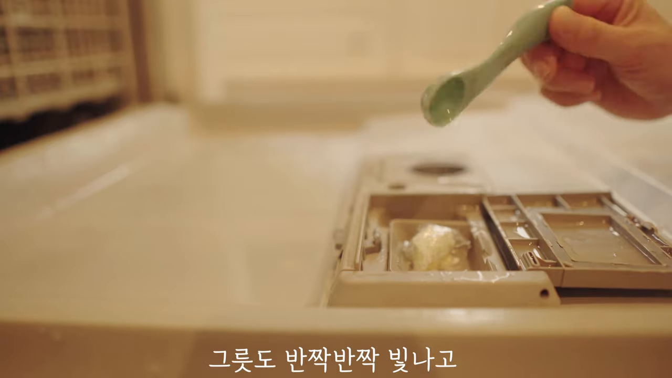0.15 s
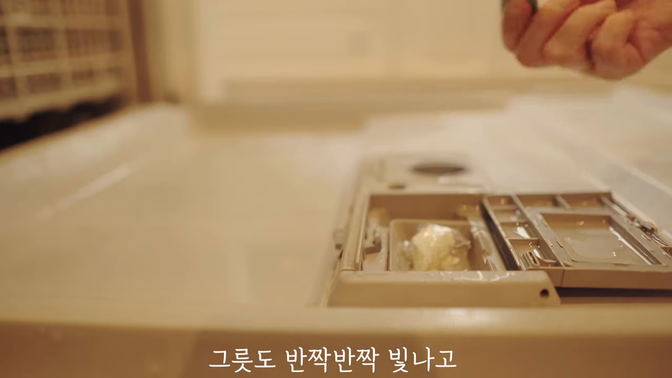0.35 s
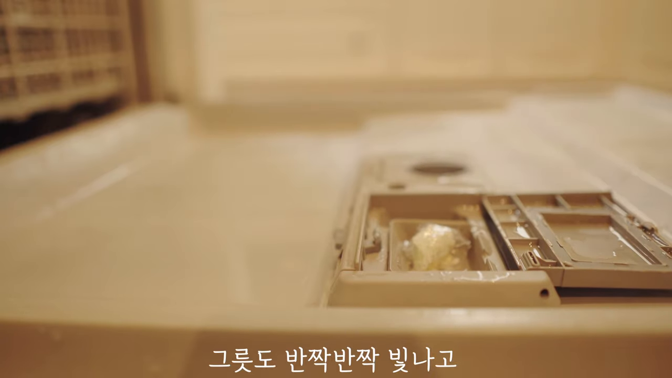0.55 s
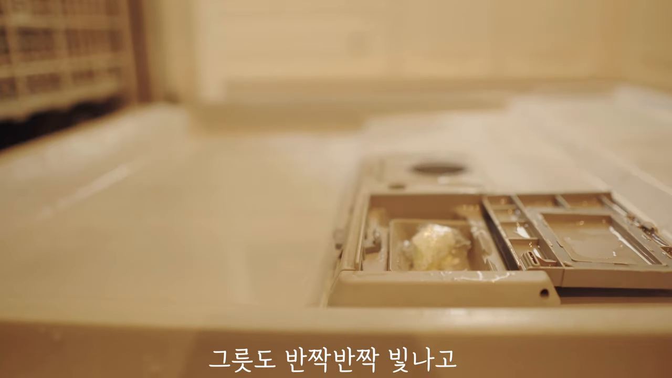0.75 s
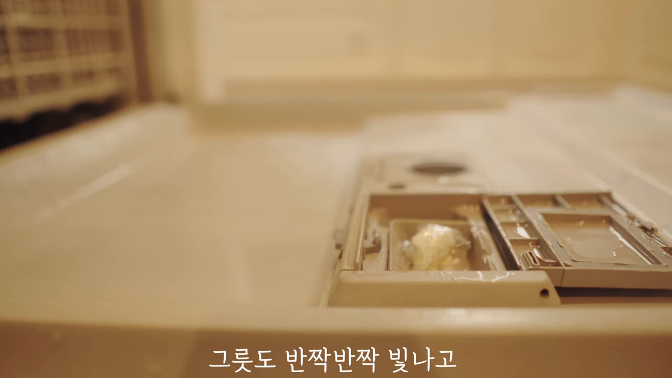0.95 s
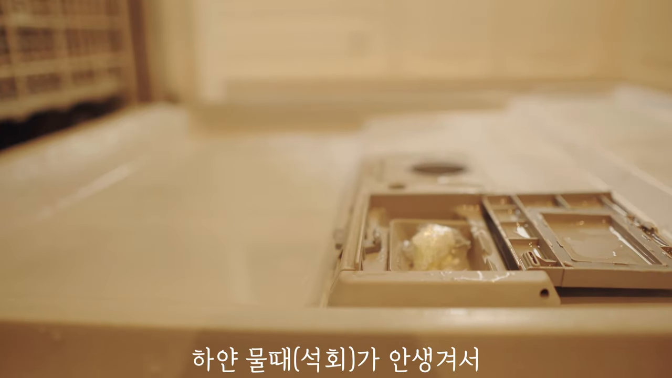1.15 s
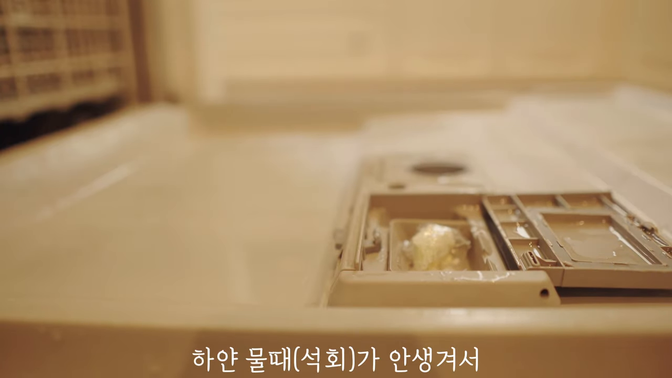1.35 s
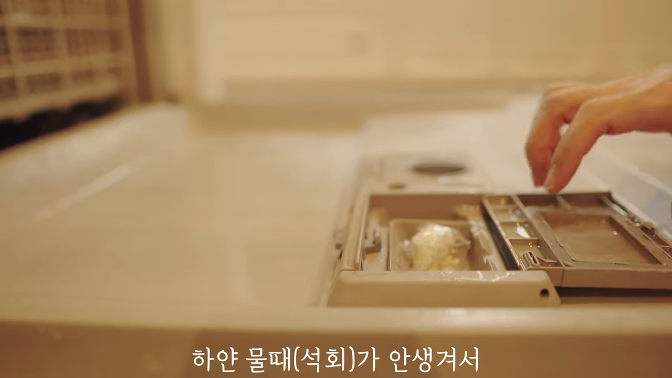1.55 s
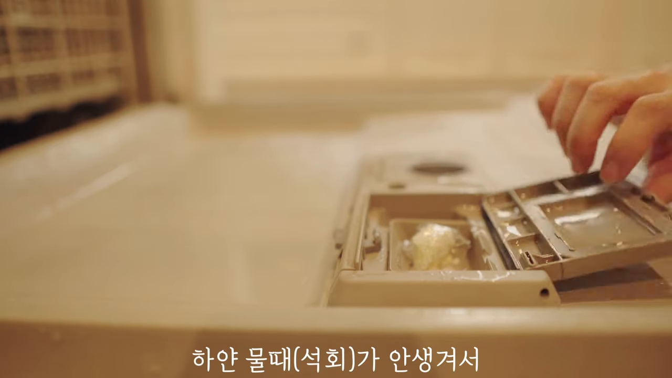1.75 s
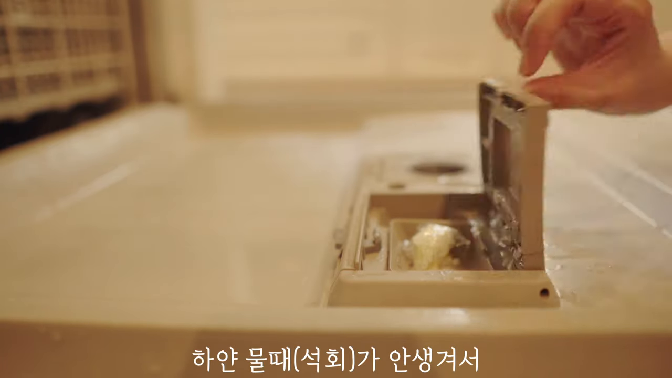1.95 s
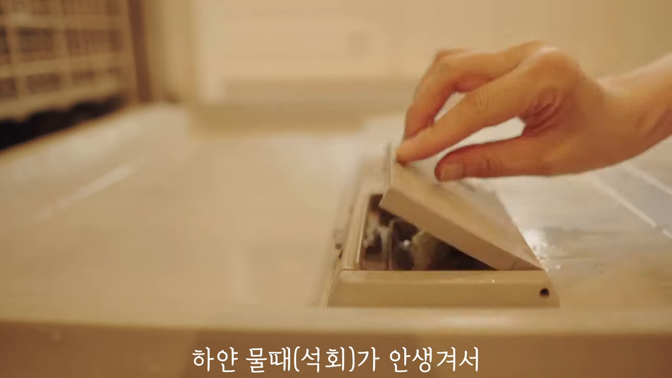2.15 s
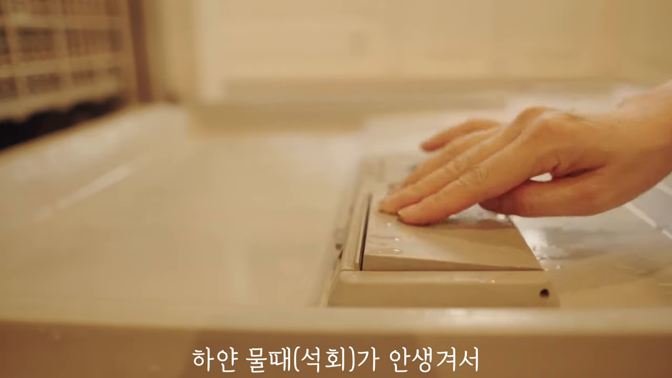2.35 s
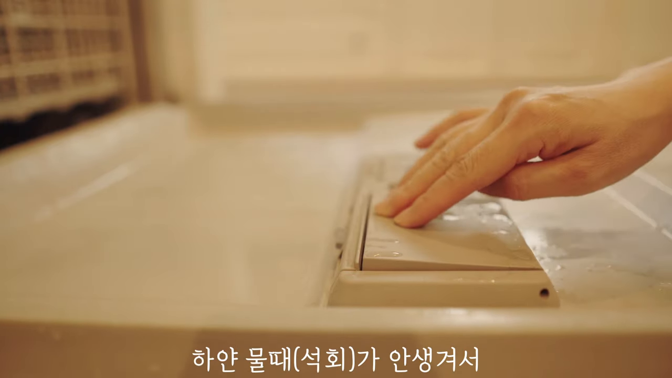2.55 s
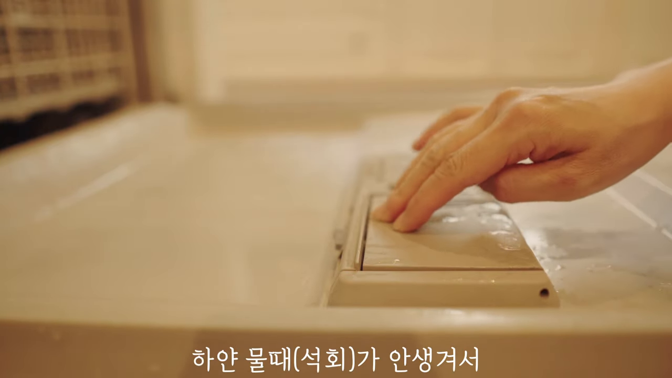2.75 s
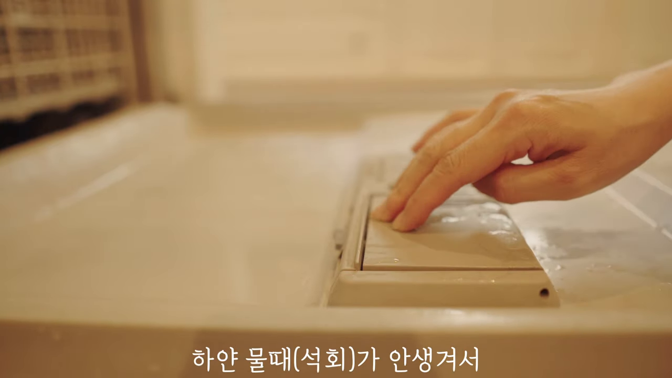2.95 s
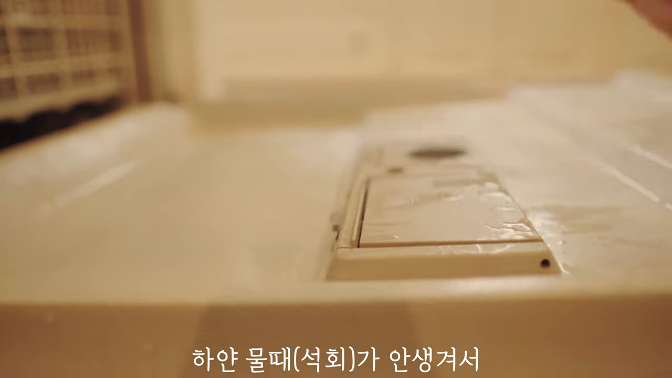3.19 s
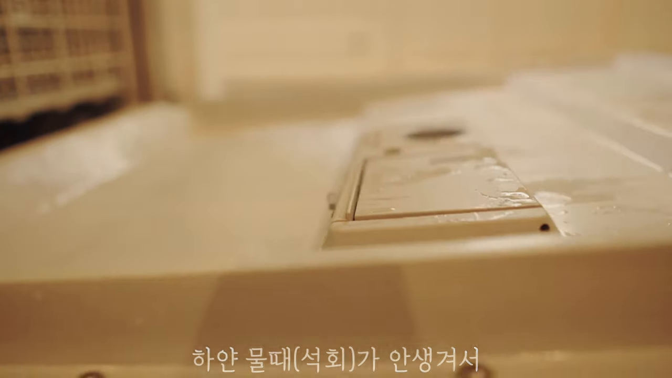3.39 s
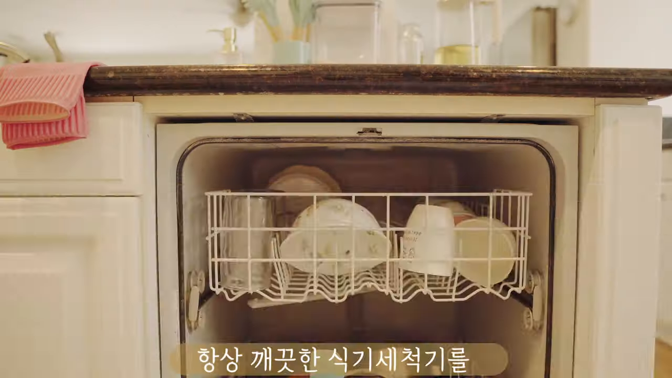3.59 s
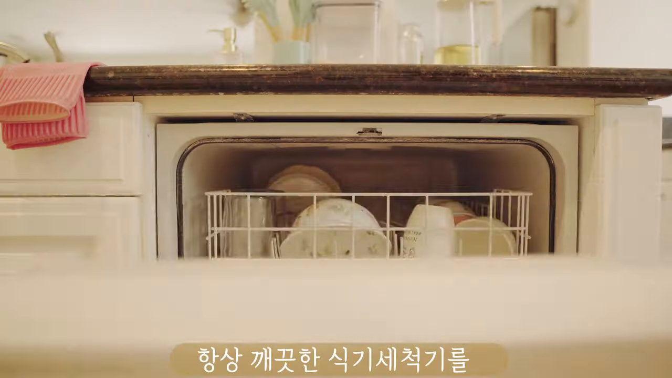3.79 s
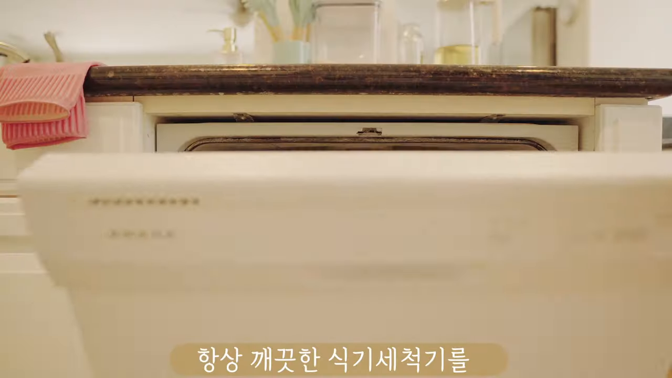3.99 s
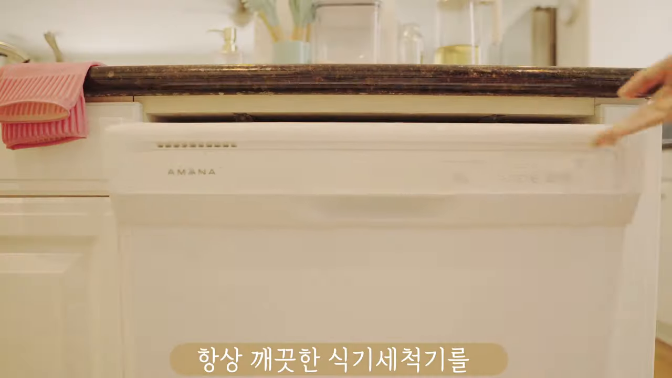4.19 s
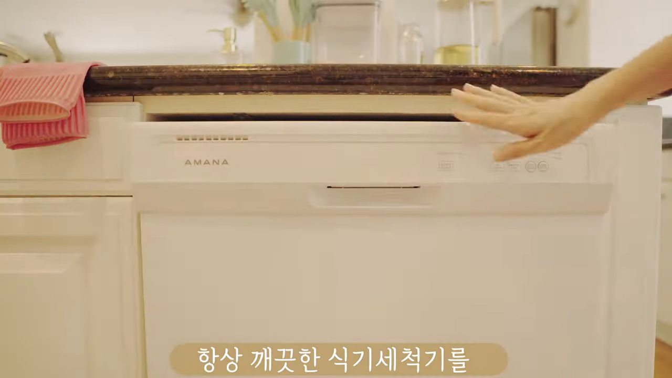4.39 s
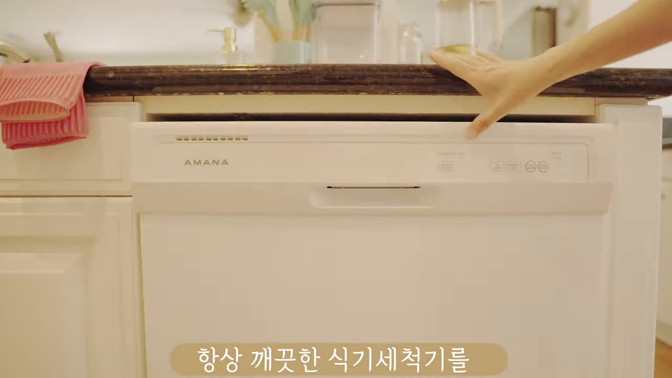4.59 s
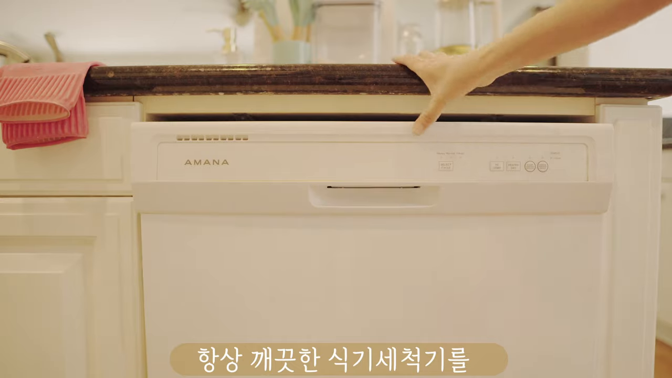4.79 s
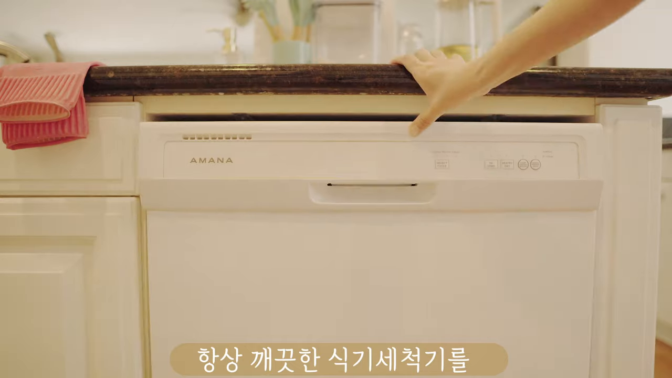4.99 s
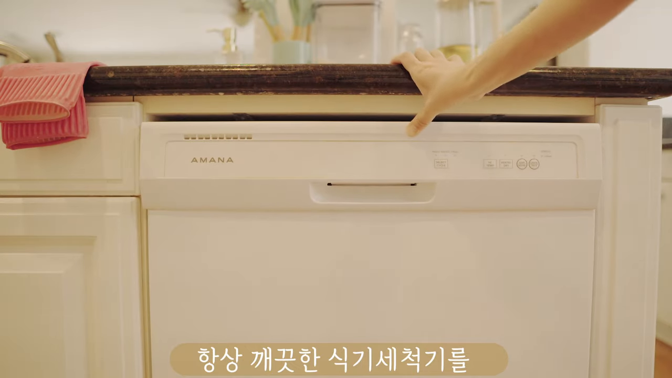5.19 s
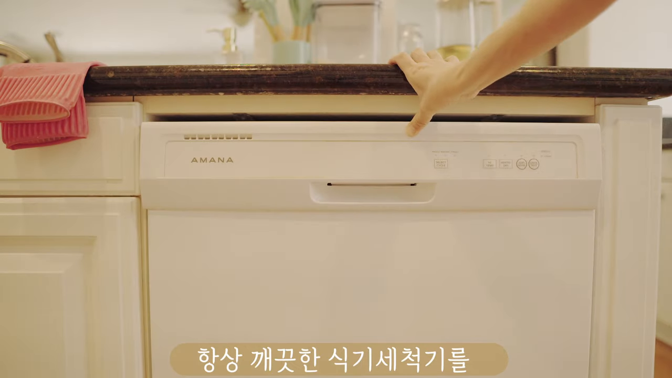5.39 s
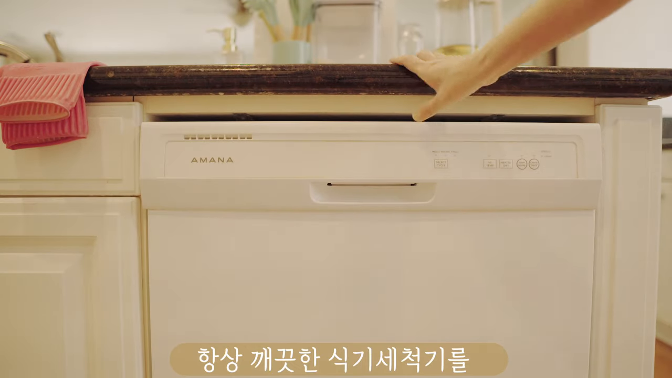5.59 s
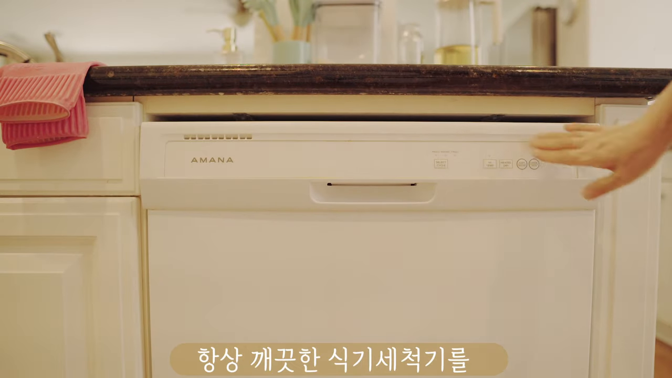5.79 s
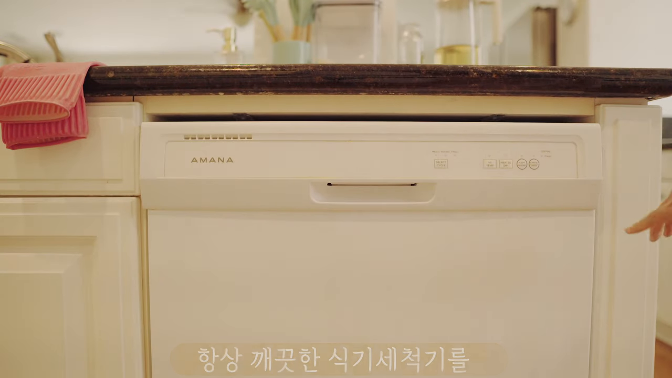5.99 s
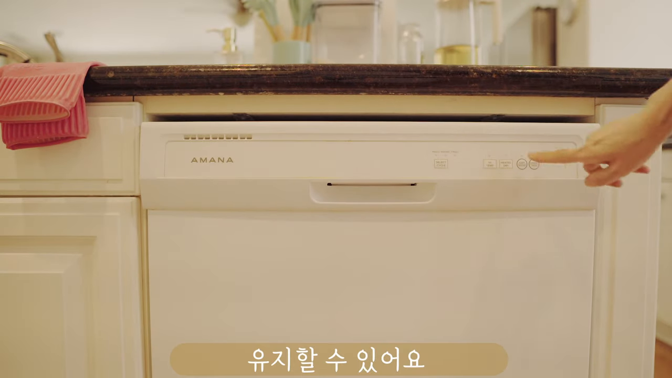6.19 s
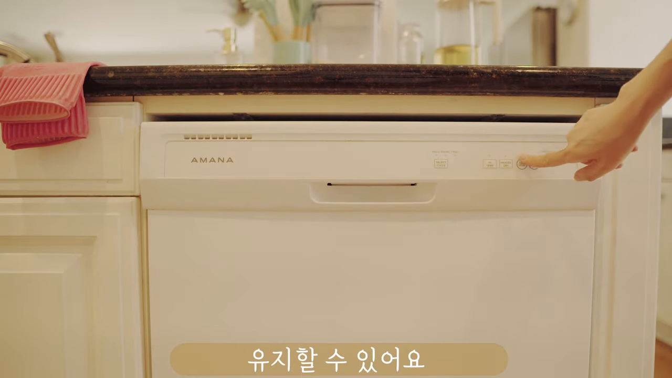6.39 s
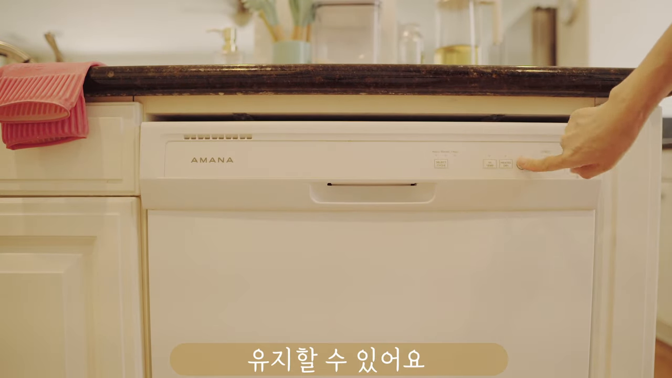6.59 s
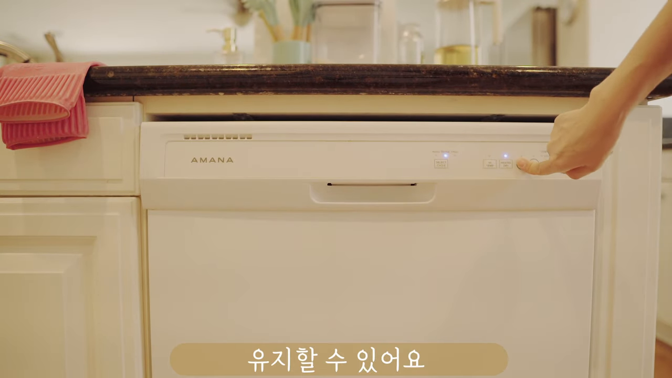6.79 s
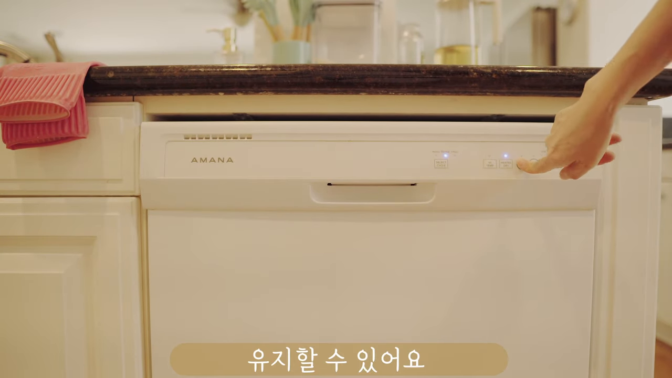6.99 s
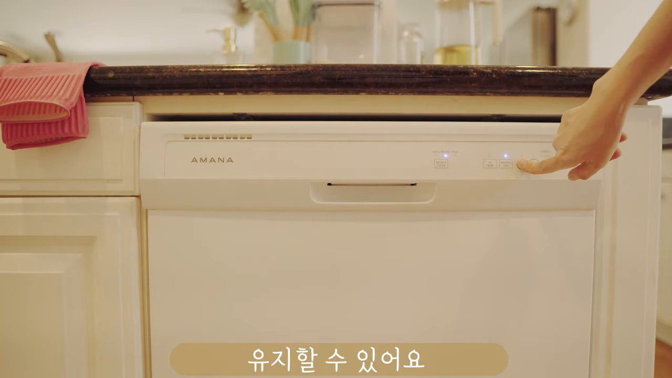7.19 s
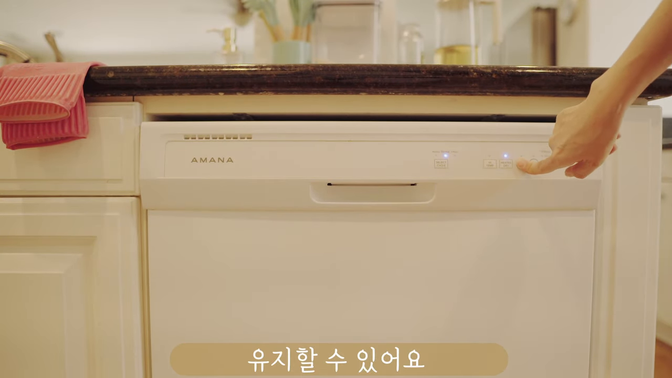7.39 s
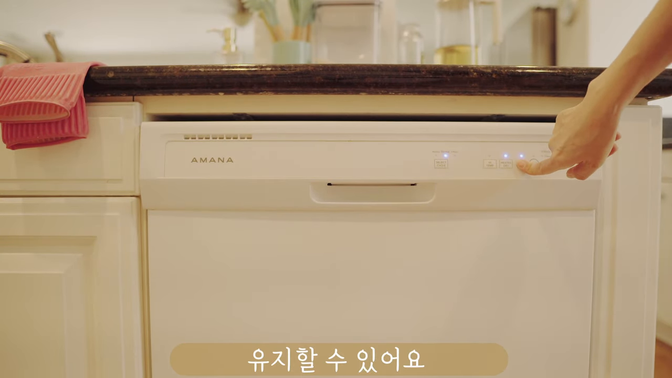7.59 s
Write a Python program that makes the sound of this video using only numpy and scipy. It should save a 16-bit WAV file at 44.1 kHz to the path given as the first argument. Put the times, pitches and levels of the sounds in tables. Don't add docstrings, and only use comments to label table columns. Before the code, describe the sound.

Close in a quiet kitchen, hands rustle and a thin plastic tub snaps twice. A hollow lid bumps over on its pins, slaps down and latches sharply, with a faint squeaky palm slide. A dishwasher door groans upward with rattling racks, clacks past its catch and slams with a low thud. After a quiet gap, two crisp button clicks follow. Soft room hum underneath.

```python
import sys
import numpy as np
from scipy import signal
from scipy.fft import rfft, irfft
from scipy.io import wavfile
from scipy.ndimage import uniform_filter1d

SR = 44100
rng = np.random.default_rng(int(sys.argv[2]) if len(sys.argv) > 2 else 0)


def to_wav(s):
    ch = np.atleast_2d(s).T
    pcm = np.round(np.clip(ch, -1, 1) * 32767)
    wavfile.write(sys.argv[1], SR, pcm.astype(np.int16))


def ratio_of_db(decibels):
    return 10 ** (np.asarray(decibels, float) / 20)


N = 337365


def band(x, lo_hz, hi_hz, order=2):
    return signal.sosfilt(signal.butter(order, [lo_hz, hi_hz], "band", fs=SR, output="sos"), x)


def unit(x):
    return x / np.sqrt(np.mean(x ** 2))


def add(out, s, sound):
    i = int(round(s * SR))
    out[i:i + len(sound)] += sound[:N - i]


def on_log(hz, table):
    table_hz, values = np.array(table).T
    return np.interp(np.log(hz), np.log(table_hz), values)


def resonate(x, peaks):
    return unit(sum(ratio_of_db(db) * unit(band(x, hz - w / 2, hz + w / 2, order=1)) for hz, w, db in peaks))


def grains(rate, spread_db):
    size = ratio_of_db(spread_db * rng.exponential(size=N)) * rng.standard_normal(N)
    return size * (rng.random(N) < rate / SR)


def flicker(rate, depth_db):
    hold = int(SR / rate)
    steps = np.repeat(rng.standard_normal(N // hold + 1), hold)
    return ratio_of_db(depth_db * uniform_filter1d(steps, hold)[:N])


def swells(rows):
    t = np.arange(N) / SR
    power = 0
    for s, up, down, db in rows:
        distance = np.maximum((s - t) / up, (t - s) / down)
        power = power + ratio_of_db(2 * db - 40 * distance)
    return np.sqrt(power)


def causal(spectrum, size=512):
    cep = irfft(np.log(ratio_of_db(on_log(np.fft.rfftfreq(size, 1 / SR) + 1, spectrum))))
    cep[1:size // 2] *= 2
    cep[size // 2 + 1:] = 0
    return irfft(np.exp(rfft(cep)))


# frequency in Hz, share of the t60.
TAIL = [(100, 0.99), (1000, 1.06), (4000, 1.06), (14000, 0.73)]


def tail(parts, t60, squeeze):
    t = np.arange(len(parts[0])) / SR
    hz = np.fft.rfftfreq(len(t), 1 / SR) + 1
    power = sum(np.abs(rfft(p)) ** 2 for p in parts)
    colour = rfft(rng.standard_normal(len(t))) * np.sqrt(np.abs(uniform_filter1d(power, size=120)))
    patches = uniform_filter1d(rng.standard_normal(len(hz)), size=100) * 10
    colour = colour * ratio_of_db(1.9 * patches)
    centres, out = 60 * 2. ** np.arange(9), 0
    for centre, share in zip(centres, on_log(centres, TAIL)):
        octave = np.clip(1 - np.abs(np.log2(hz / centre)), 0, 1)
        out = out + irfft(colour * octave, len(t)) * ratio_of_db(-60 * t / (t60 * share))
    held = 1 / (1 + squeeze * ratio_of_db(-60 * t / t60))
    onset = 1 - np.exp(-t / 0.00087)
    return out / np.std(irfft(colour)) * onset * held / held[0]


RING_T60_S = dict(tub=0.25, lid=0.41, latch=.53, door=0.46, catch=0.29, pawl=0.37, slam=0.56, button=0.42)



def blows(name, hits, modes, crack, blow):
    rise_ms, chatter_ms, crack_db, lag_ms, squeeze = blow
    out, t = np.zeros(N), np.arange(32768) / SR
    ms = 1000 * t[:2048]
    push = np.minimum(ms / rise_ms, np.exp((rise_ms - ms) / chatter_ms)) ** 2
    click = causal(crack)
    for s, peak_db, thud_db, snap_db, wet_db in hits:
        contact = (1 + 1.8 * rng.standard_normal(len(ms))) * push
        body = np.zeros(len(t))
        for hz, db, t60 in modes:
            detune = 1 + 0.026 * rng.standard_normal()
            body += ratio_of_db(db - 60 * t / t60) * np.cos(2 * np.pi * hz * detune * t)
        click_gain = ratio_of_db(crack_db) * np.sqrt(np.sum(body ** 2) / np.sum(click ** 2))
        add(body, 0, click * click_gain)

        parts = [band(body, lo, hi) for lo, hi in ((60, 700), (700, 3500), (3500, 17000))]
        levels = ratio_of_db((thud_db, 0, snap_db))
        rings = [signal.fftconvolve(p, contact - contact.mean())[:len(t)] for p in parts]
        rings = [g * r / np.abs(r).max() for g, r in zip(levels, rings)]
        rings[0] = np.roll(rings[0], int(lag_ms * SR / 1000))
        strike = sum(rings)
        wash = tail([g * p / np.abs(p).max() for g, p in zip(levels, parts)], RING_T60_S[name], squeeze)
        add(out, s - rise_ms / 2000, ratio_of_db(peak_db) * (strike + ratio_of_db(wet_db) * wash))
    return out


TUB_HITS = [
    (0.314, -52.5, 2, 6, 1),
    (0.913, -36, -11, -1, -12),
    (1.088, -43, 3, -7, -9),
    (1.133, -30, -11.5, -12, -7),
    (1.178, -13.5, -41, -7.5, -19),
    (1.543, -27.5, 0.5, -14, -7.5),
    (1.59, -13.5, -21, -6.5, -17.5),
]
TUB_MODES = [(730, 3.5, 0.03), (1026, -20, 0.013), (1500, -6, 0.038), (2020, 4.5, 0.016), (2820, -4, 0.026),
             (4130, 5, 0.015)]
TUB_CRACK = [(59, -49), (100, -5), (1520, -10), (3400, -15.5), (4110, -16), (5300, -7.5), (8830, 3),
             (16000, -32)]
TUB_BLOW = (4.2, 6.8, 8.9, 15, 0.064)


def tub():
    return blows("tub", TUB_HITS, TUB_MODES, TUB_CRACK, TUB_BLOW)


LID_HITS = [
    (2.218, -39.5, -8, 10.5, -16),
    (2.2815, -10, -1, -10.5, -14),
    (2.607, -47, 8, -12, -18),
    (3.055, -49, 4, -11, 3),
    (3.557, -43, 12, 3, 5),
]
LID_MODES = [(220, 16, 0.1), (362, 5.5, 0.087), (430, -3, 0.053), (1090, 0, 0.046), (1300, 2, 0.06),
             (2440, 2, 0.017)]
LID_CRACK = [(59, -29), (100, -20), (335, -1), (373, -1), (872, -33), (1100, 3.5), (2130, -42),
             (16000, -45)]
LID_BLOW = (3.5, 2.4, 0.83, 2.52, 0.13)


def lid():
    return blows("lid", LID_HITS, LID_MODES, LID_CRACK, LID_BLOW)


LATCH_HITS = [
    (2.774, -22.5, -4, 2.4, -4),
]
LATCH_MODES = [(270, -0.5, 0.083), (402, 2, 0.09), (647, 0.16, 0.079), (1330, 3, 0.17), (6450, -2, 0.03)]
LATCH_CRACK = [(59, -30), (100, -5), (166, -33), (239, -11), (634, -4), (910, -10.5), (1250, 7),
               (16000, -8.5)]
LATCH_BLOW = (2.5, 2.1, 13.3, .1, 1.16)


def latch():
    return blows("latch", LATCH_HITS, LATCH_MODES, LATCH_CRACK, LATCH_BLOW)


DOOR_HITS = [
    (3.625, -38, 8.5, -13, 2.5),
    (3.879, -34, 2, -13, -24),
    (4.374, -31, -12, -6, -20),
    (4.917, -31, 4.5, -5, -6.5),
    (5.064, -34.5, 10.5, -7, -1.5),
    (5.098, -29.5, 2, 2, -15),
    (5.473, -32.5, 0.5, -5, -11.5),
    (6.922, -47, 10, -14, 1.5),
]
DOOR_MODES = [(183, -3, 0.068), (237, -9, 0.24), (500, -6, 0.054), (970, 1, .04), (1690, 17, 0.046),
              (2530, 8, .03)]
DOOR_CRACK = [(59, -21), (100, -3), (260, -3.5), (328, 1), (930, -6.5), (1830, -6.5), (16000, -38)]
DOOR_BLOW = (0.23, 5.4, 6.1, 3.41, 0.92)


def door():
    return blows("door", DOOR_HITS, DOOR_MODES, DOOR_CRACK, DOOR_BLOW)


CATCH_HITS = [
    (4.908, -24, -9.5, -4.5, -10),
]
CATCH_MODES = [(1550, 6, 0.028), (2090, 5, 0.03), (2460, 2, 0.027), (5800, 0, 0.013)]
CATCH_CRACK = [(180, -7), (300, 4), (1150, -11), (1500, 1), (2900, -9), (3600, -11), (10700, -23),
               (16000, -30)]
CATCH_BLOW = (0.27, 5.2, 5.2, 4.35, 0.57)


def catch():
    return blows("catch", CATCH_HITS, CATCH_MODES, CATCH_CRACK, CATCH_BLOW)


PAWL_HITS = [
    (5.007, -30.5, -9.5, -1.5, -6),
    (5.167, -30, 4, -11, -7.5),
]
PAWL_MODES = [(1500, -4, 0.02), (2680, -1, 0.03), (3530, 6, 0.028), (4590, -2, .02)]
PAWL_CRACK = [(180, -8), (400, 1), (1150, -6.5), (2600, -3), (4800, -1), (5600, -22), (10700, -19),
              (16000, -33)]
PAWL_BLOW = (0.4, 7.3, 8, 4.4, 0.6)


def pawl():
    return blows("pawl", PAWL_HITS, PAWL_MODES, PAWL_CRACK, PAWL_BLOW)


SLAM_HITS = [
    (5.199, -20, -1.5, 3.8, -5.5),
]
SLAM_MODES = [(216.4, 4, 0.3), (433, -2, 0.11), (560, -6, 0.035), (730, -0.5, 0.3), (1570, -3, 0.05)]
SLAM_CRACK = [(59, -49), (100, -9.5), (700, -4.5), (1230, -11), (1580, -6), (2470, -16), (7610, -24),
              (16000, -31.5)]
SLAM_BLOW = (0.54, 14, 3.3, 5.84, 3.1)


def slam():
    return blows("slam", SLAM_HITS, SLAM_MODES, SLAM_CRACK, SLAM_BLOW)


BUTTON_HITS = [
    (6.666, -19.5, -19, -3.5, -15),
    (7.408, -20, -23, -4, -14),
    (7.644, -38.5, 0, 9.5, -2),
]
BUTTON_MODES = [(420, -17, 0.04), (560, -10, 0.034), (956, 3, 0.2), (1260, 2, 0.04), (1670, 13, 0.05),
                (2140, 1, 0.04), (2740, 3, 0.05), (4140, 5, 0.018), (5800, 3, .02)]
BUTTON_CRACK = [(59, -59), (100, -21), (283, -11), (502, -20), (800, -24), (1600, -8.5), (2800, -13.5),
                (16000, -46.5)]
BUTTON_BLOW = (0.18, 6.9, 6.7, 3.6, 0.037)


def buttons():
    return blows("button", BUTTON_HITS, BUTTON_MODES, BUTTON_CRACK, BUTTON_BLOW)


# start in seconds, peak in
# dB, frequency in Hz, t60 in seconds.
THUMPS = [(2.765, -26, 340, 0.24), (3.557, -21, 202, .14), (4.927, -29, 173, 0.2), (5.065, -27, 496, 0.092),
          (6.921, -30.5, 516, 0.087), (6.673, -27, 930, .09), (7.415, -26.5, 930, .09), (3.1, -40, 260, .1),
          (3.068, -30, 200, .09), (5.475, -34, 210, .12), (2.287, -26, 270, .1)]
# start in seconds, peak in dB, frequency in Hz,
# t60 in seconds.
PINGS = [(1.585, -31, 4120, .09), (1.177, -32, 2900, .04), (1.19, -38, 2200, .15), (2.282, -25, 1310, .08),
         (4.909, -33, 1580, .09), (6.666, -30, 1650, .07), (7.408, -30, 1650, .07), (6.68, -38, 1800, .3),
         (7.42, -38, 1800, .3)]


def thumps():
    out, t = np.zeros(N), np.arange(16384) / SR
    for rows, ratio, share, rise_s in ((THUMPS, 1.19, 0.72, .003), (PINGS, 1.04, .4, .0015)):
        onset = 1 - np.exp(-t / rise_s)
        for s, db, hz, t60 in rows:
            note = np.sin(2 * np.pi * hz * t) + share * np.sin(2 * np.pi * ratio * hz * t)
            add(out, s, ratio_of_db(db - 60 * t / t60) * note * onset)
    return out


# peak in seconds, swell in seconds, fade in seconds, level in dB.
SWING = [
    (1.71, 0.22, 0.49, -45.5),
    (2.056, 0.33, 0.18, -40),
    (2.218, 0.084, 0.11, -33),
]
# frequency in Hz, width in Hz, level in dB.
SWING_NOTE = [(247.4, 18.6, -2), (366, 42, -13.5)]
# start in seconds, peak in dB.
BUMPS = [(1.606, -23), (1.736, -34), (1.889, -47), (1.987, -38), (2.041, -30.5), (2.09, -33),
         (2.195, -26.5), (2.225, -38)]
# peak, swell and fade in seconds, level in dB.
FINGERS = [
    (1.76, 0.18, 0.15, -43.5),
    (2.04, 0.27, 0.6, -53),
]


def lid_swing():
    out = swells(SWING) * resonate(grains(600, 2.5), SWING_NOTE)
    t = np.arange(8192) / SR
    note = sum(ratio_of_db(g) * np.sin(2 * np.pi * hz * t) * np.exp(-np.pi * w * t) for hz, w, g in SWING_NOTE)
    for s, db in BUMPS:
        add(out, s, ratio_of_db(db + 3.0) * note * (1 - np.exp(-t / 0.0015)))
    return out + swells(FINGERS) * unit(band(rng.standard_normal(N), 93, 123))


# peak, swell and fade in seconds, level in dB.
SQUEAL = [
    (3.155, 0.036, .2, -46),
    (3.205, 0.085, .1, -48),
]
# frequency in Hz, width in Hz, level in dB.
SQUEAL_BANDS = [(1510, 90, -6), (2150, 47, 3), (3140, 54, -1), (3280, 50, -4), (3770, 50, -4),
                (5240, 50, -9), (7240, 50, -10)]


def squeal():
    return swells(SQUEAL) * resonate(rng.standard_normal(N), SQUEAL_BANDS)


# time in seconds, pulling effort in dB.
RAISE = [(3.62, -33.5), (3.75, -37.5), (3.83, -37.5), (3.95, -34), (4.07, -31.5), (4.22, -35), (4.36, -42),
         (4.49, -50.5), (4.62, -60.5)]
# time in seconds, level in dB.
JERKS = [(3.628, -48), (3.676, -36.5), (3.889, -34.5), (4.05, -31.5), (4.242, -30), (4.388, -36.5)]
# frequency in Hz, width in Hz, level in dB.
HINGE = [(195, 74, 3), (276, 65, -3.5), (393, 30, -2), (510, 81, 5.5), (670, 110, -3.5), (844, 29, -1.5),
         (985, 30, 0.5), (1110, 90, -3)]
# peak, swell and fade in seconds, level in dB.
GRIT = [
    (3.89, 0.21, 0.032, -45.5),
    (4.08, 0.57, 0.38, -45),
]


def door_raise():
    swell_s, fade_s = 0.066, 0.053
    jerks = swells([(s, swell_s, fade_s, db) for s, db in JERKS])
    s, effort_db = np.transpose(RAISE)
    pull = ratio_of_db(np.interp(np.arange(N) / SR, s, effort_db, left=-140, right=-140))
    shell = unit(band(resonate(grains(3000, .6), HINGE), 91, 1170, order=5))
    grit = unit(band(grains(6000, 2.1), 1330, 2600)) * flicker(30, 1.4)
    return np.hypot(pull, jerks) * shell + swells(GRIT) * grit


# start in seconds, level in dB.
SHAKES = [(4.048, -46.5), (4.075, -46), (4.097, -44), (4.129, -42), (4.162, -44), (4.2, -43),
          (4.248, -49.5), (4.284, -59), (4.3745, -47), (4.395, -55)]
# frequency in Hz, level in dB, t60 in seconds.
RACK = [(2030, 2, 0.074), (2900, -7, .06), (3480, -2, .1), (5770, -4, .12), (6740, -8, 0.075),
        (7490, -13, .05), (8460, -3, .08), (9110, -4, 0.11), (9500, -8, .07), (10100, -9, .1),
        (11700, -10, .07), (12500, -12, .08), (13800, -9, .09)]


def racks():
    ring_db, clink_db, clink_ms = -21, 0, 9
    shake, t = np.zeros(N), np.arange(4096) / SR
    for s, db in SHAKES:
        add(shake, s, ratio_of_db(db) * np.exp(-1000 * t / clink_ms))
    clinks = shake * rng.standard_normal(N)
    steel = sum(ratio_of_db(db - 60 * t / t60) * np.sin(2 * np.pi * hz * t) for hz, db, t60 in RACK)
    ringing = signal.fftconvolve(clinks, steel)[:N]
    return ratio_of_db(ring_db) * ringing + ratio_of_db(clink_db) * band(clinks, 2500, 15500)


# peak in seconds, swell in seconds, fade in seconds, level in dB,
# brightness in dB. First hands on tub and lid, from 2.99 s the palm sliding off the lid, from 3.56 s the sleeve
RUSTLE = [(0.152, 1.7, 3.8, -62, -4), (0.602, 0.34, 0.67, -52, -1.5), (0.818, 0.54, 0.26, -51, -0.5),
          (.99, 0.34, .4, -56.5, -2.5), (.918, .015, .04, -51, 5), (.346, .01, .02, -62, 8),
          (0.282, .3, .2, -66.5, 9.5), (1.098, .05, 0.12, -49.5, 4), (1.18, .01, 0.076, -44, -1),
          (1.288, .4, 0.74, -48.5, -3), (1.422, 0.11, 0.14, -41, 3), (1.595, 0.01, 0.046, -37.5, -5),
          (1.652, 0.084, 0.45, -51, -1), (1.982, 0.29, 0.73, -47.5, -1), (2.24, 0.33, 0.16, -48, 1),
          (2.3, 0.051, 0.32, -50.5, 0.5), (2.59, 1.1, 0.069, -55, -3.5),
          (2.99, 0.045, .15, -57, -1), (3.075, 0.15, 0.084, -51.5, 0), (3.165, 0.094, 0.23, -46.5, 2.5),
        (3.225, 0.2, 0.11, -49, 4), (3.45, 1, 0.93, -58.5, -6.5),
          (3.562, 0.025, 0.044, -51, 4.5), (3.66, 0.17, 1, -51, -2), (3.88, 0.014, 0.16, -45, -8),
          (4.08, 0.29, 0.73, -46, -2), (4.27, 0.68, 0.063, -53.5, -10.5), (4.38, 0.013, 0.065, -48.5, 7.5),
          (4.76, 0.4, .2, -68, 11), (4.938, .012, 0.024, -51, 8), (5.02, 0.039, 0.13, -59, 6.5),
          (3.7, .15, .2, -60, 10), (4.89, 0.124, 0.033, -62, -14.5), (5.56, .03, 0.33, -62.5, 1),
          (5.752, 0.038, 0.14, -62, -9.5), (5.9, 0.22, 0.55, -68, -5)]


def rustle():
    out = 0
    strokes = RUSTLE
    for lean, offset_db, lo, hi in ((0, 0, 1500, 5000), (-1, 0, 150, 1500), (1, -2.5, 5000, 16500)):
        gain = swells([(s, up, down, db + offset_db + lean * tilt) for s, up, down, db, tilt in strokes])
        out = out + gain * unit(band(grains(9000, 0.44), lo, hi)) * flicker(24.8, 2.0)
    return out


# peak in seconds, fade in seconds, level in dB.
BOOM = [(.91, .4, -66), (1.7, 0.31, -42.5), (2.04, 0.36, -53), (2.3, 0.53, -42), (2.85, 0.33, -41),
        (3.56, 1.8, -44.5), (3.98, .8, -45), (4.275, 0.37, -36), (4.55, 0.081, -39), (4.94, 0.69, -37.5),
        (5.09, 0.1, -32), (5.26, 0.19, -30.5), (5.54, 0.13, -38)]
# frequency in Hz, width in Hz.
PANEL = (77.7, 21), (43, 25)
# peak, swell and fade in seconds, level in dB.
STEPS = [
    (.91, .15, 0.19, -54),
    (4.67, .5, 0.43, -52),
    (5.8, 0.51, 2.2, -59.5),
]


def booms():
    swell_s, floor_share_db, panel_rest_db, floor_rest_db = 0.11, -13, -73, -65
    t = np.arange(N) / SR
    panel, floor = (unit(band(rng.standard_normal(N), hz - w / 2, hz + w / 2)) for hz, w in PANEL)
    panel_tone, floor_tone = (np.sin(2 * np.pi * hz * t) for hz, w in PANEL)
    note = 0.71 * panel + 0.4 * panel_tone
    push = swells([(s, swell_s, fade, db) for s, fade, db in BOOM])
    shake = np.hypot(ratio_of_db(floor_share_db) * push, swells(STEPS))
    ground = (shake + ratio_of_db(floor_rest_db)) * (.75 * floor + .7 * floor_tone)
    return push * note + ratio_of_db(panel_rest_db) * panel + ground


# frequency in Hz, level in dB per Hz.
ROOM = [(35, -58), (60, -6.5), (180, -13), (294, -13.5), (579, -16), (1170, -19), (3270, -26.5),
        (16000, -34.5)]


def room():
    colour = ratio_of_db(on_log(np.fft.rfftfreq(N, 1 / SR) + 1, ROOM))
    air = unit(irfft(rfft(rng.standard_normal(N)) * colour, N))
    return ratio_of_db(-55) * air * flicker(3.72, 0.11)


def scene():
    struck = tub() + lid() + latch() + door() + catch() + pawl() + slam() + buttons() + thumps()
    moving = lid_swing() + squeal() + door_raise() + racks() + rustle()
    mono = struck + moving + booms() + room()
    return np.array([mono, mono])


# frame number, thinned above in Hz, empty above in Hz.
STARVED = [(0, 3500, 16000), (9, 1800, 13500), (14, 4000, 14500), (15, 4000, 13500), (32, 3000, 10000),
           (88, 5000, 16000), (105, 4500, 16000), (135, 5200, 10500), (140, 1800, 13500), (144, 600, 8000),
           (152, 3500, 12500), (153, 3500, 12500), (196, 4500, 9500), (202, 2500, 12000),
           (222, 1500, 12800), (223, 2000, 12800), (227, 3000, 9000), (233, 2300, 8500), (234, 4000, 8500),
           (249, 4500, 8200), (264, 2000, 14500), (280, 3000, 12000), (283, 2500, 12500),
           (286, 3000, 15000), (295, 1700, 12500), (346, 4000, 9000)]


def starve(x):
    first_frame_s, hop = .111, 941
    size = 2 * hop
    out, hz = x.copy(), np.fft.rfftfreq(size, 1 / SR)
    window = np.sin(np.pi * (np.arange(size) + .5) / size)
    for frame, thin_hz, empty_hz in STARVED:
        i = int(first_frame_s * SR) + (frame - 1) * hop
        first, last = np.split(x[i:i + size] * window, 2)
        lines = rfft(np.r_[first - first[::-1], last + last[::-1]])
        height = np.abs(lines) / uniform_filter1d(np.abs(lines), size=40)
        bar = np.interp(hz, [thin_hz, thin_hz + 2500, empty_hz, empty_hz + 1], [1.5, 2.1, 2.35, 99])
        kept = uniform_filter1d(1. * (height > bar), size=3) > .1
        change = lines * (hz > thin_hz) * np.where(kept, .4, -1)
        add(out, i / SR, window * irfft(change, size))
    return out


PARTED = [.79, 1.825, 1.965, 3.315, 3.635, 3.85, 5.33, 5.63, 5.93, 7.09, 7.235, 7.63]


def parting(x, size=1600):
    gate = np.zeros(N)
    for s in PARTED:
        add(gate, s - size / SR / 2, ratio_of_db(-11) * np.hanning(size))
    loudness = np.sqrt(np.abs(uniform_filter1d(band(x, 4000, 15500) ** 2, size=400)))
    return gate * loudness * unit(band(rng.standard_normal(N), 4000, 15500, order=4))


def low_pass(x):
    return signal.sosfilt(signal.butter(12, 16650, fs=SR, output="sos"), x)


def record(dry):
    top_cut = signal.ellip(10, .2, 60, 15800, fs=SR, output="sos")
    mono = signal.sosfilt(top_cut, starve(dry[0]))
    side = parting(mono)
    return low_pass(np.array([mono + side, mono - side]))


dry = scene()
out = record(dry)
to_wav(out)
```